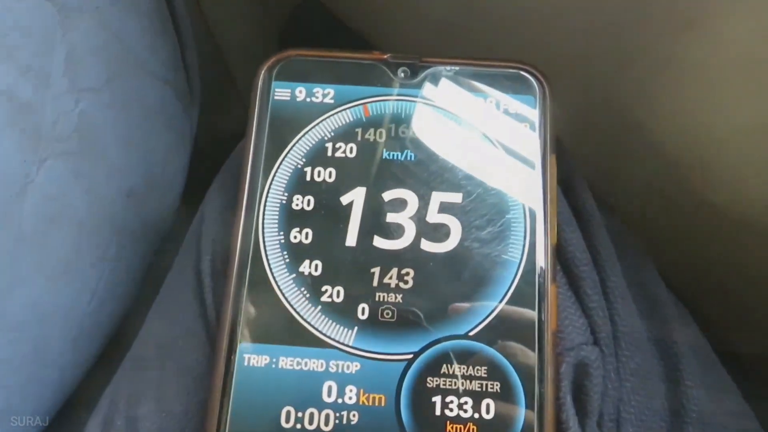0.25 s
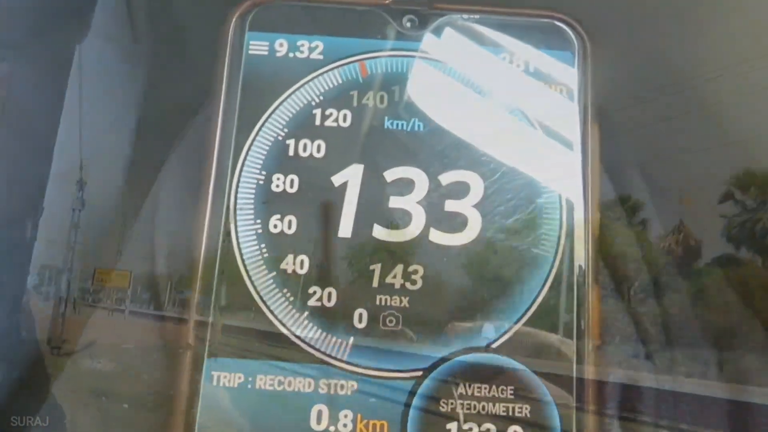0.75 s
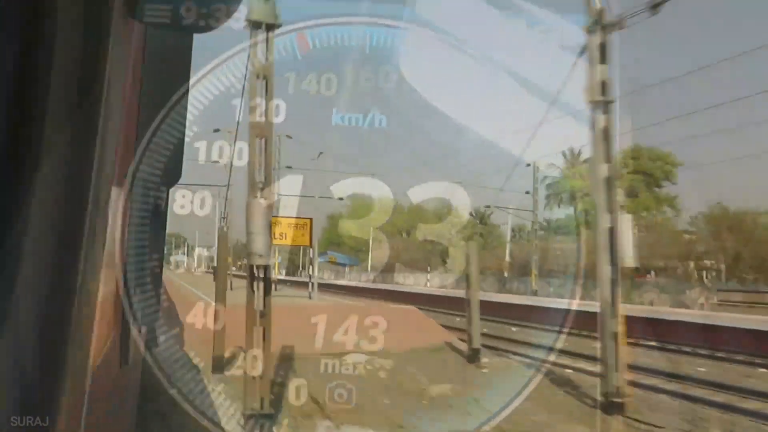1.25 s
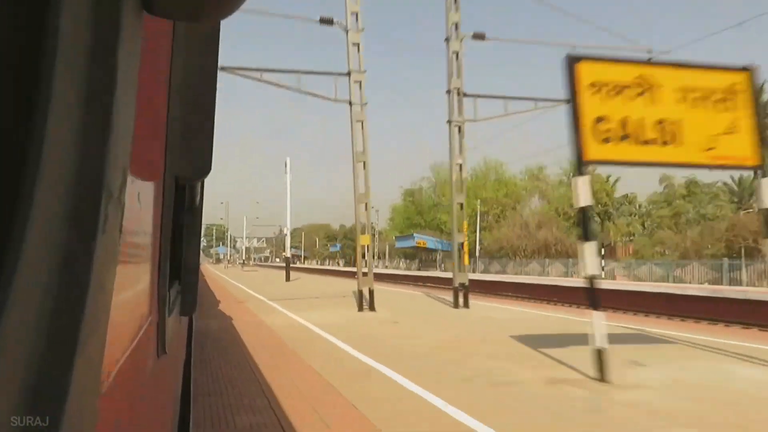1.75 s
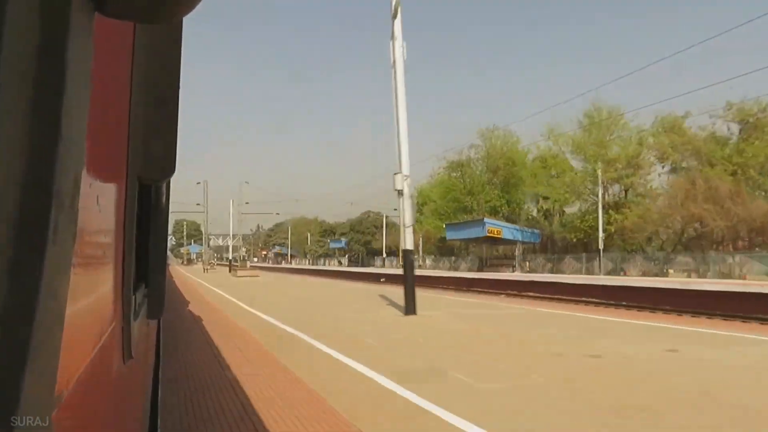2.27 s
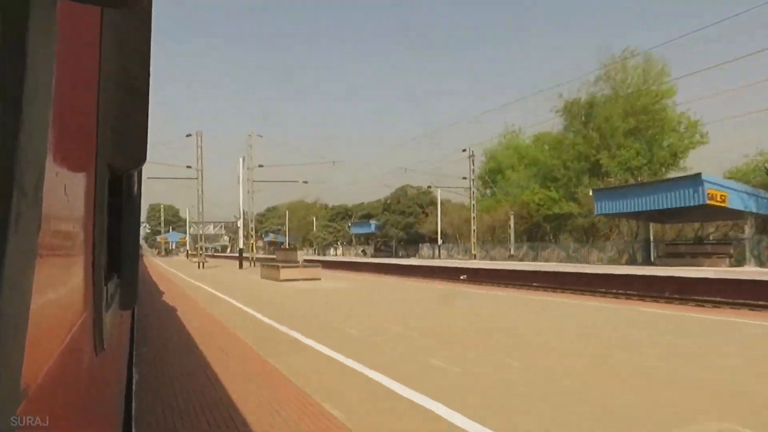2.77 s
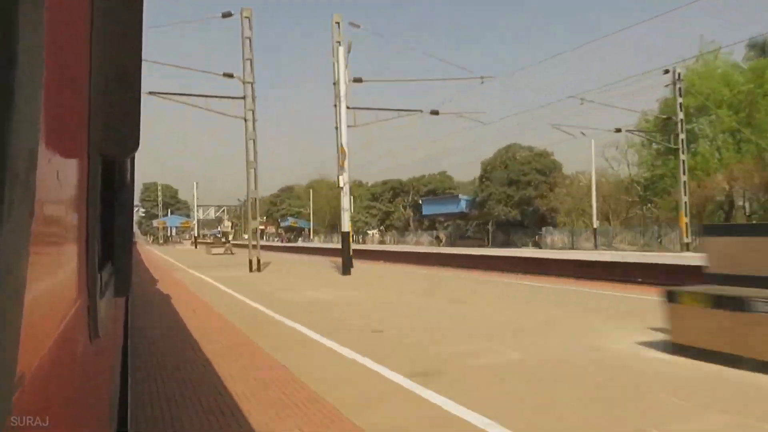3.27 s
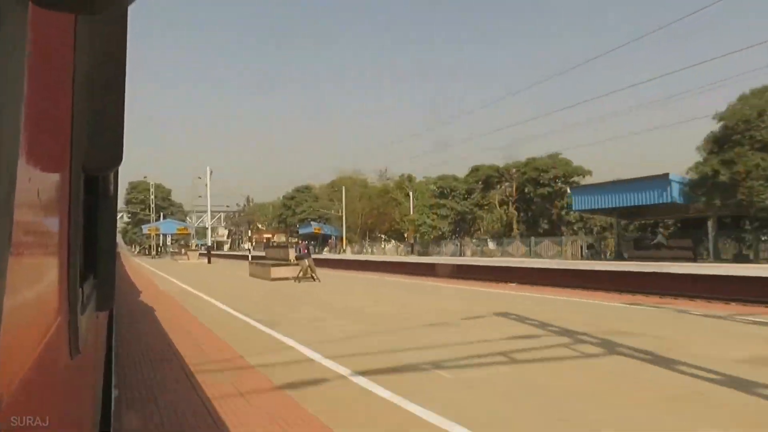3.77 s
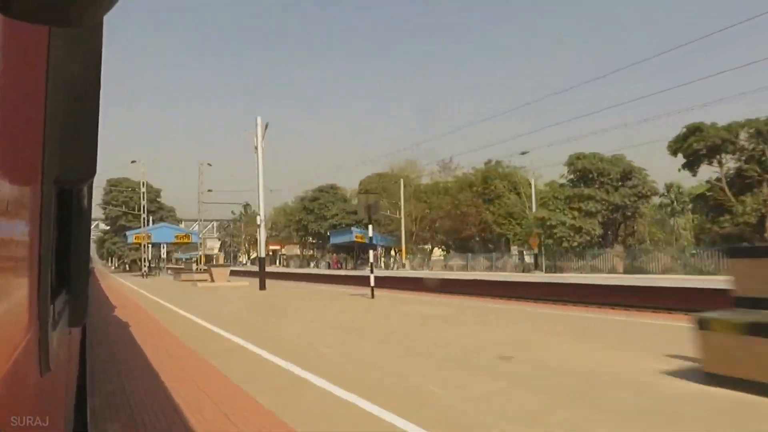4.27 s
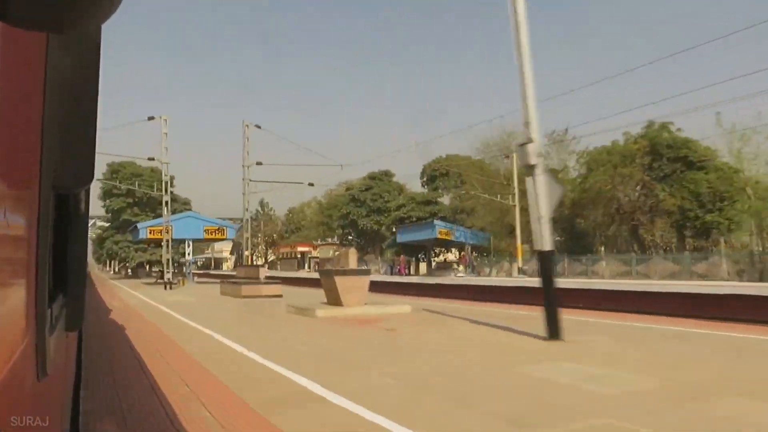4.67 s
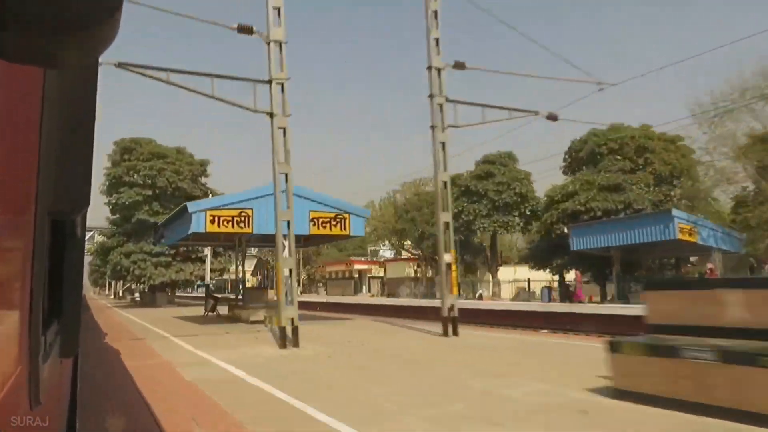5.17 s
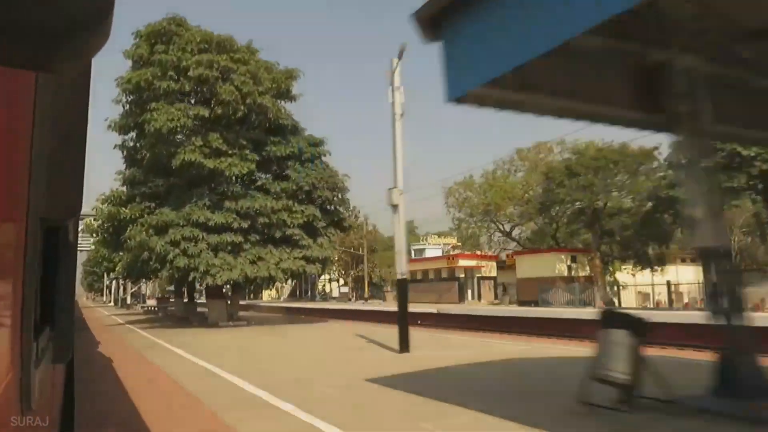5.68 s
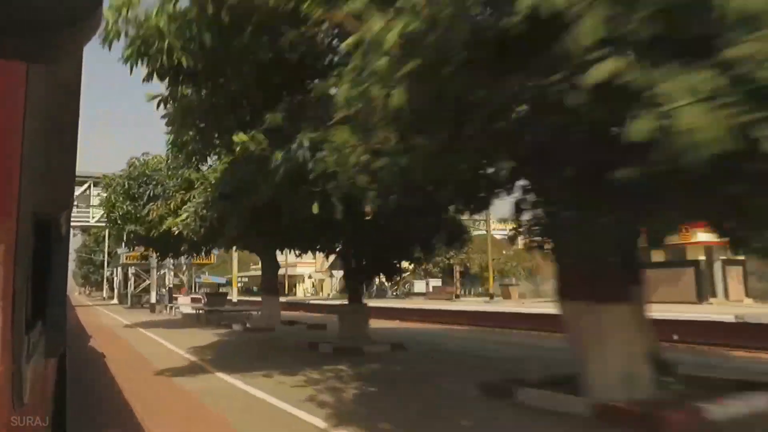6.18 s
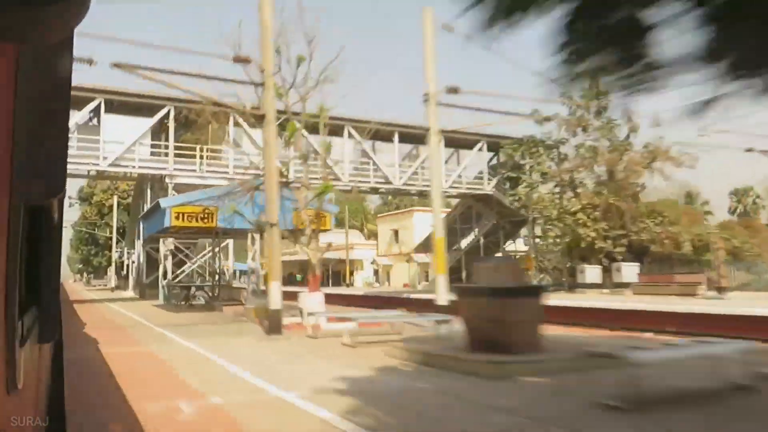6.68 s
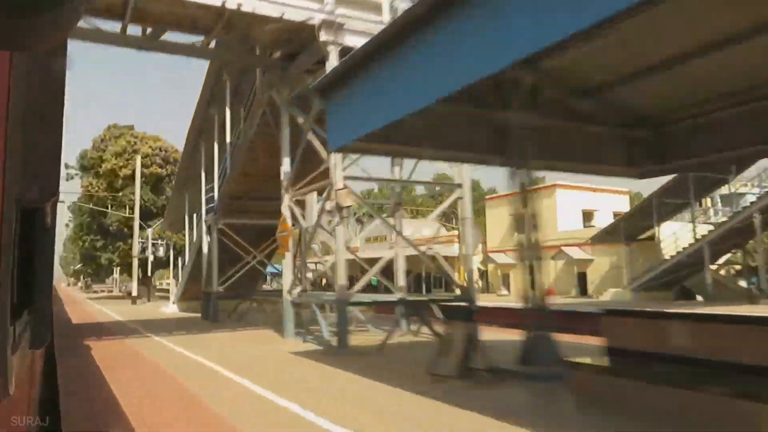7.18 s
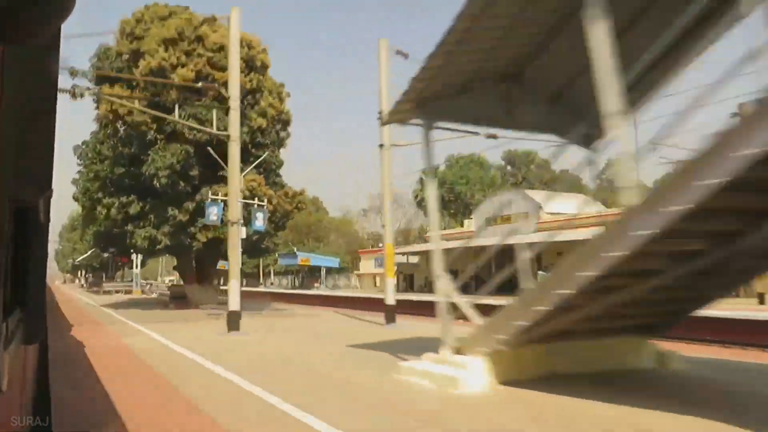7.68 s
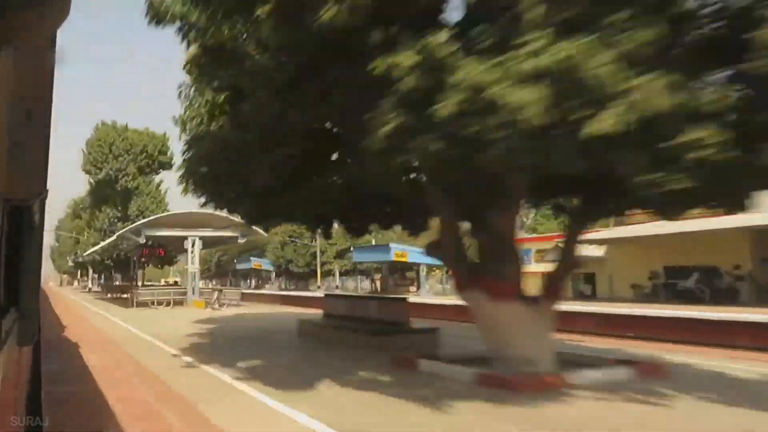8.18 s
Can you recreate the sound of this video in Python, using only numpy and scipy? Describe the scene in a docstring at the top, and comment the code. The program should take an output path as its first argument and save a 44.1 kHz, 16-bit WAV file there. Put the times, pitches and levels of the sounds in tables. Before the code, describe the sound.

From 0 s we are seated inside a fast train coach: a deep, lumpy boom around the low bass, broad rolling noise and draught, with heavy ringing body thumps near 0.1, 0.2 and 0.5 s and a faint wavering pair of thin high tones that ends by 1.2 s. The interior fades out until 1.7 s, crossing into an open doorway. From 1.5 to 2.4 s it is comparatively quiet, with thin airy hiss, light slaps and small pops. A cluster of wind pops and slaps hits at 2.3-2.9 s, then another near 3.0 s and a brief easing. From 4.1 s the resonant, metallic wheel-and-rail roar is strong and gusts thicken, buffeting the close stereo microphone in rapid irregular bursts. Especially hard low pops land near 5.4, 5.55 and 6.95 s, with deep air pushes around 7 s. A slight lull at 7.5 s, then more gusts until the abrupt end at about 8.4 s.

```python
"""A fast passenger train heard from on board: wheels and rails roar as noise lifted at their resonances.
A booming seat inside the coach, with ringing thumps and two thin tones, fades over into the open doorway.
There, gusts of the airstream buffet a pair of close microphone ports: turbulent noise of single eddies,
with sudden slaps, short waves for the pressure pops and a thin band of hiss."""
import sys
import numpy as np
from scipy import signal
from scipy.fft import rfft, irfft, next_fast_len
from scipy.io import wavfile
from scipy.ndimage import uniform_filter1d

SR = 44100
rng = np.random.default_rng(int(sys.argv[2]) if len(sys.argv) > 2 else 0)


def transcribe(u):
    """Save the signal u as a 16-bit wav file named by the first command-line argument.

    u: samples, shape (n,) or (channels, n), limited to [-1, 1]; the rate is SR.
    q: integer samples, one column per channel.
    """
    v = np.clip(np.atleast_2d(u).T, -1, 1)
    q = np.round(v * 32767).astype(np.int16)
    wavfile.write(sys.argv[1], SR, q)


def ratio(d):
    """dB to gain"""
    e = np.asarray(d, float) / 20
    return 10 ** e


N = 372204
T = np.arange(N) / SR  # time of every sample, s

# Colour of the coach boom. Each row: frequency in Hz, relative density in dB per Hz.
BOOM_COLOUR = [(15, -29), (30, -1), (45, -4), (60, 4.5), (80, -7.5), (115, -3), (170, -6.5), (260, -18.5),
               (400, -31), (800, -62.5)]
# The boom's difference between the ports over their sum. Each row: frequency in Hz, ratio in dB.
BOOM_APART = [(25, -38), (150, -19.5), (600, -3)]
# Jolts of the coach body that swell the boom. Each row: peak time in seconds, lift in dB.
JOLTS = [(0.24, 4.5), (0.5, 5), (0.89, 5), (1.25, 6)]
# Rolling noise over the even roar at the seat. Each row: time in seconds, base level in dB.
ROLL = [(0.21, -28.5), (0.29, -50), (1.48, -46.5), (1.69, -39.5), (2.09, -39.5), (2.98, -34), (3.02, -30),
        (3.26, -35.5), (3.38, -30.5), (4.09, -26), (4.28, -19), (4.33, -25.5), (4.58, -21.5), (4.89, -21.5),
        (4.92, -24.5), (5.55, -21.5), (5.58, -30), (5.99, -23.5), (6.3, -25.5), (6.93, -19), (6.98, -24.5),
        (7.29, -22), (7.33, -30), (7.72, -25.5), (8.44, -25.5)]
# Colour of the rolling noise. Each row: frequency in Hz, relative density in dB per Hz.
ROLL_COLOUR = [(40, -1), (200, 8), (500, -3), (1200, 5), (2000, 5.5), (2550, 1), (3050, -2.5), (3450, -8),
               (5400, -4.5), (6200, -17.5), (8000, -23.5), (11000, -28.5), (12500, -32), (15000, -4.5)]
# Rail and wheel resonances standing out of the roar. Each row: centre in Hz, width in Hz, mean height in dB.
RINGS = [(451.6, 69, 21.5), (833.4, 74, 18.5), (1008, 76, 11), (1625, 210, 8), (1843, 83, 7.5),
         (2240, 44, 6.5), (2865, 215, 9), (3790, 18, 12), (4220, 20, 9), (4630, 90, 6.5)]
# How the roar differs at the seat. Each row: frequency in Hz, lift in dB.
SEAT_COLOUR = [(1500, -4), (1850, 0.5), (2900, 4.5), (4050, 2.5), (5500, -6), (7000, 1.5), (11000, 2)]
# The seat's colour goes: its start and end in seconds.
SEAT_GONE = (1.15, 1.3)
# The roar's treble. Each row: time in seconds, lift in dB, factor on the height of its resonances.
TREBLE = [(1.5, 3, 0.9), (3, 1, .8), (4.4, 1, 1), (4.7, 1.5, 1.3), (5.5, 3, 1.4), (5.65, 2, 0.74),
          (8.44, 0, 0.64)]
# Brief flares of the roar. Each row: peak time in seconds, lift in dB.
FLARES = [(2.73, 4.5), (4.78, 4), (4.89, 3), (4.96, 3), (5.74, 3), (6.0, 2.5), (6.17, 3), (6.47, 3.5),
          (7.0, 3.5), (7.1, 2.5)]
# Far sound: the ports' difference over their sum. Each row: frequency in Hz, ratio in dB.
APART_FAR = [(25, -37), (1500, -57), (2600, -20.5), (3400, -9.5), (5500, -9.5), (8000, 1.5), (13000, 3.5)]
# Eddies at the ports: their difference over their sum. Each row: frequency in Hz, base ratio in dB.
APART_NEAR = [(25, -63), (250, -48), (450, -20.5), (1000, -18.5), (2000, -8), (5000, 7), (13000, 11)]
# Colour of the deep heave of air. Each row: frequency in Hz, relative density in dB per Hz.
HEAVE_COLOUR = [(15, -24), (35, -16), (70, 1), (110, 4.5), (170, -15), (300, -81.5)]
# Colour of the buffeting. Each row: frequency in Hz, relative density in dB per Hz.
WIND_COLOUR = [(30, -33), (80, -21.5), (140, -2.5), (230, -0.5), (400, -0.5), (600, -12), (900, -36.5),
               (1600, -58), (9000, -100)]
# Colour of the brighter rasp. Each row: frequency in Hz, relative density in dB per Hz.
RASP_COLOUR = [(200, -40), (450, -8), (700, 0), (1300, -3), (2000, -12), (3200, -28), (5500, -40),
               (7500, -50), (10000, -70)]
# Colour of the slaps. Each row: frequency in Hz, relative density in dB per Hz.
SLAP_COLOUR = [(40, -40), (120, -14), (250, -3), (500, -2.5), (800, -11), (1600, -27), (9000, -100)]
# Airstream at the doorway between gusts. Each row: time in seconds, buffeting in dB, rasp in dB.
STREAM = [(1.2, -46, -45.5), (1.95, -40.5, -41.5), (2.18, -51, -45), (2.21, -41, -45.5), (2.5, -35, -40),
          (2.95, -31, -33), (3.38, -41, -40), (3.76, -41, -36.5), (4.1, -37.5, -29.5), (4.5, -34.5, -26.5),
          (4.85, -26.5, -27.5), (5.35, -29.5, -27), (5.48, -33.5, -32), (5.95, -27.5, -28.5),
          (6.44, -29, -27.5), (6.85, -23.5, -24.5), (7.05, -38.5, -30), (7.3, -26.5, -28),
          (7.57, -40, -33.5), (7.85, -25, -27), (8.44, -26, -24.5)]
# Gusts that swell the buffeting. Each row: start in seconds, length in seconds, peak gain in dB.
GUSTS = [(1.618, 0.13, -35), (2.48, 0.15, -28.5), (2.644, 0.068, -26), (2.714, 0.23, -28.5),
         (2.985, 0.09, -25.5), (3.362, 0.33, -29), (3.823, 0.12, -35), (4.123, 0.26, -22.5),
         (4.344, 0.1, -23.5), (4.574, 0.14, -22.5), (4.773, 0.053, -16), (4.853, 0.1, -20.5),
         (4.936, 0.058, -14), (5.004, 0.072, -16), (5.139, 0.13, -21.5), (5.269, 0.072, -19),
         (5.378, 0.092, -21.5), (5.508, 0.1, -23), (5.568, 0.11, -18.5), (5.672, 0.095, -25),
         (5.844, 0.12, -19.5), (5.964, .11, -17.5), (6.104, 0.079, -16.5), (6.263, 0.13, -17.5),
         (6.462, 0.08, -18), (6.58, 0.11, -21), (6.734, 0.084, -17.5), (6.877, 0.12, -19.5),
         (7.06, 0.21, -18.5), (7.223, .11, -15.5), (7.337, 0.13, -26.5), (7.632, 0.045, -22),
         (7.681, 0.11, -22.5), (7.838, 0.16, -33), (8.13, 0.046, -22), (8.21, 0.058, -20),
         (8.262, 0.071, -17.5), (8.351, 0.042, -16)]
# Deep pushes of air in the heave. Each row: peak time in seconds, lift in dB.
PUSHES = [(4.96, 4), (5.17, 11), (6.15, 9), (6.97, 19.5), (7.11, 5), (7.3, 9), (8.38, 17)]
# Sudden slaps of air. Each row: start in seconds, gain in dB, rasp over the slap in dB, length in seconds.
SLAPS = [(1.338, -36, -2.5, 0.042), (1.454, -36, -3, 0.015), (1.645, -34.5, -2, 0.054),
         (1.735, -33, 1, 0.046), (1.874, -43, -2, 0.028), (2.21, -32.5, -1, 0.016),
         (2.391, -32.5, -4.5, 0.026), (2.558, -21.5, -9, 0.022), (2.712, -20, -6, 0.059),
         (2.73, -20, -9, 0.027), (2.789, -23, -5, 0.01), (2.813, -25, -5, 0.0084),
         (2.834, -19.5, -5, 0.012), (3.35, -26, -2.5, 0.02), (4.117, -21, 0.5, 0.045),
         (4.202, -20, 0, 0.012), (4.398, -15, -19, 0.01), (4.775, -18.5, 3.5, 0.017),
         (4.869, -20.5, 1, 0.039), (5.53, -15, 1, 0.028), (5.738, -11.5, -4, 0.0079),
         (6.118, -20, 1.5, 0.022), (6.467, -13, -14, 0.01), (6.735, -12, -10, 0.0086),
         (7.087, -13, -19, 0.034), (7.277, -18.5, 3, 0.036), (7.71, -23.5, -2, 0.092)]
# How far the eddies strike one port alone. Each row: time in seconds, base lift of the difference in dB.
ONE_SIDED = [(0, 4.5), (1.4, 10), (2.1, -3), (2.25, 14), (3.3, -5), (4.15, -18), (4.85, -28), (5.05, -2.5),
             (7.55, -7), (8.44, -3.5)]
# Colour of the doorway hiss. Each row: frequency in Hz, relative density in dB per Hz.
HISS_COLOUR = [(4500, -23), (6200, 5), (7300, 0.5), (8300, -8), (10500, -41)]
# The hiss before it wavers. Each row: time in seconds, level in dB.
HISS_LEVEL = [(1.45, -71), (1.65, -59.5), (2.3, -63.5), (8.44, -78)]
# Two thin tones at the seat. Each row: mean pitch in Hz, starting level in dB before it wavers.
WHINE_TONES = [(1820, -41), (1880, -46)]
# Heavy thumps of the coach body. Each row: start in seconds, gain in dB.
THUMPS = [(0.093, -14), (0.173, -9), (0.462, -9.5)]
# Modes in which the body rings. Each row: pitch in Hz, gain in dB, time to fall by 60 dB in seconds.
BODY = [(58.6, -2, 0.51), (115, -7.5, 0.65), (161.2, -6, 0.29), (288.7, -12, 0.21)]
# Pops of air pressure on the ports. Each row: start in seconds, gain in dB, pitch in Hz.
POPS = [(1.526, -21, 680), (2.319, -16, 435), (2.368, -21, 320), (2.408, -22, 800), (2.446, -13.5, 610),
        (2.5, -7.5, 850), (2.564, -10, 520), (2.598, -18, 303), (2.655, -17, 460), (2.742, -8, 237),
        (3.022, -13, 800), (3.034, -15, 330), (4.351, -16, 606), (5.435, -1.5, 535), (5.551, -0.5, 436),
        (6.955, -0.5, 627), (7.742, -7, 296), (8.302, -6, 323)]

# The seat fades out evenly, bent by a power for the boom and for the roar
SEAT_END_S, BOOM_CURL, ROAR_CURL = 1.72, 1.48, 1
ROAR_STEP_DB = -4  # roar and draught at the seat slide down while the seat's colour goes
# Base levels at the start of the seat's fade
BOOM_DB, SEAT_ROLL_DB, SEAT_BUFFET_DB, SEAT_RASP_DB = -18.5, -28, -30.5, -27.5
JOLT_RISE_S, JOLT_FALL_S = 0.015, 0.07
RING_DRIFT, RING_WAVER_DB = 0.004, 1.5  # wander of a resonance: share of its pitch, dB of its height
SEAT_RINGS_BELOW_HZ = 2500  # higher resonances are not heard at the seat
TREBLE_HZ = 3370
FLARE_RISE_S, FLARE_FALL_S = 0.006, 0.011
FLARE_HISS_DB = -16.5  # flare hiss against the rolling level, before the flare's own gain
GUST_LATE, GUST_ROUND = 1.37, 0.61  # a gust peaks late and ends quickly; small round = flat top
RASP_SHARE = 0.5  # share of a gust's lift in dB that the rasp takes
# Heave: base level at -25 dB of buffeting, dB per dB of buffeting, smoothing time
HEAVE_DB, HEAVE_SLOPE, HEAVE_SMOOTH_S = -45, 1.14, 0.12
PUSH_RISE_S, PUSH_FALL_S = 0.02, 0.11
SIDE_SLOPE = 0.48  # a gust strikes more one-sided: dB per dB of buffeting over -25 dB
WHINE_FADE_DB_PER_S, WHINE_WAVER_DB, WHINE_WAVER_HZ, WHINE_END_S = -3.5, 2, 9, 1.19
POP_CYCLES = 1.52  # cycles until a pop's envelope has fallen to about a third
POP_EDGE, POP_EDGE_DB = 2.1, -10.5  # brighter, shorter edge on each pop: multiple of its pitch, dB


def evened(x):
    """Scales to rms 1."""
    return x / np.sqrt(np.mean(x ** 2) + 1e-20)


def read(points, hz):
    """Reads a spectrum on a log-frequency axis."""
    f, value = np.transpose(points)
    return np.interp(np.log(hz + 1), np.log(f + 1), value)


def curve(rows):
    """Draws the columns of a table as curves over every sample."""
    s, *columns = np.transpose(rows)
    return [np.interp(T, s, c) for c in columns]


def lumps(hz):
    """Slow random wander of rms 1: noise low-passed at hz."""
    lowpass = signal.butter(2, np.clip(hz, 1, 2000), fs=SR, output="sos")
    return evened(signal.sosfilt(lowpass, rng.standard_normal(N)))


def swells(rows, rise_s, fall_s):
    """Sum of brief lifts in dB, each peaking at its time."""
    return sum(db * np.exp(np.minimum((T - s) / rise_s, (s - T) / fall_s)) for s, db in rows)


def at_ports(drive, colour, apart):
    """Colours a common and an unshared drive; the two ports get their sum and difference."""
    size = next_fast_len(N)
    hz = np.fft.rfftfreq(size, 1 / SR)
    both, odd = rfft(drive, size) * ratio(read(colour, hz))
    odd = odd * ratio(read(apart, hz))
    both, odd = irfft([both, odd], size)[:, :N]
    return np.array([both + odd, both - odd]) / np.std(both)


def seat():
    """Gains of the boom and of the roar heard at the seat, as the seat fades out."""
    left = np.clip(1 - T / SEAT_END_S, 0, 1)
    step_db = np.interp(T, SEAT_GONE, [0, ROAR_STEP_DB])
    return left ** BOOM_CURL, left ** ROAR_CURL * ratio(step_db)


def boom():
    """Low lumpy shaking of the coach body, swelling at each jolt."""
    lift_db = swells(JOLTS, JOLT_RISE_S, JOLT_FALL_S)
    shake = rng.standard_normal((2, N)) * ratio(1.5 * lumps(45))
    return at_ports(shake, BOOM_COLOUR, BOOM_APART) * ratio(BOOM_DB + lift_db) * seat()[0]


def rolling():
    """Roughness of wheel and rail: noise in drifting patches, lifted at the steel's resonances."""
    level = np.hypot(ratio(curve(ROLL)[0]), ratio(SEAT_ROLL_DB) * seat()[1])
    hz, t, noise = signal.stft(rng.standard_normal((2, N)), SR, nperseg=1024, noverlap=768)

    # each resonance wanders slowly in pitch and height
    wander = uniform_filter1d(rng.standard_normal((len(RINGS), len(t), 2)), size=40, axis=1)
    drift, waver = evened(wander).transpose(2, 0, 1)
    rings_db = 0
    for (centre, width, db), d, v in zip(RINGS, drift, waver):
        detune = 2 * (hz[:, None] - centre * (1 + RING_DRIFT * d)) / width
        rings_db = rings_db + (db + RING_WAVER_DB * v) / (1 + detune ** 2)

    # the seat has its own colour and loses the high resonances
    unheard_db = rings_db * (hz > SEAT_RINGS_BELOW_HZ)[:, None]
    tilt_db = (read(SEAT_COLOUR, hz)[:, None] - unheard_db) * np.interp(t, SEAT_GONE, [1, 0])

    s, lift_db, depth = np.transpose(TREBLE)
    treble = 1 / (1 + (TREBLE_HZ / (hz + 1)) ** 10)
    tilt_db += np.outer(treble, np.interp(t, s, lift_db))
    tilt_db += treble[:, None] * rings_db * (np.interp(t, s, depth) - 1) * (t > SEAT_GONE[1])

    patches = uniform_filter1d(rng.standard_normal(noise.shape[1:]), size=6, axis=0)
    patches = evened(uniform_filter1d(patches, size=14, axis=1))
    coloured = noise * ratio(rings_db + tilt_db + 1.6 * patches)
    rough = signal.istft(coloured, SR, nperseg=1024, noverlap=768)[1][:, :N]
    sway_db = 1.07 * lumps(17) + swells(FLARES, FLARE_RISE_S, FLARE_FALL_S)
    return at_ports(rough, ROLL_COLOUR, APART_FAR) * level * ratio(sway_db)


def eddies(per_s, spread_db, share):
    """Single pressure pulses of either sign, a few large, over smooth turbulence."""
    hit = rng.random((2, N)) < per_s / SR
    size = ratio(spread_db * np.minimum(rng.exponential(1, (2, N)), 4))
    size = size * rng.choice([-1, 1], (2, N))
    return share * evened(hit * size) + (1 - share) * rng.standard_normal((2, N))


def airstream():
    """Gains of buffeting, rasp and heave: gusts over the steady stream, plus the draught at the seat."""
    calm, rasp = ratio(np.array(curve(STREAM)))
    gusts = np.zeros(N)
    for s, length, db in GUSTS:
        u = np.clip((T - s) / length, 0, 1)
        gusts += ratio(db) * np.abs(np.sin(np.pi * u ** GUST_LATE)) ** GUST_ROUND * (u < 1)
    buffet = np.hypot(calm, gusts)
    rasp = rasp * (buffet / calm) ** RASP_SHARE

    # the heave follows the smoothed buffeting
    smooth = np.sqrt(np.abs(uniform_filter1d(buffet ** 2, round(HEAVE_SMOOTH_S * SR))))
    push_db = swells(PUSHES, PUSH_RISE_S, PUSH_FALL_S)
    heave = ratio(HEAVE_DB + push_db) * (smooth / ratio(-25)) ** HEAVE_SLOPE

    draught = seat()[1]
    buffet = np.hypot(buffet, ratio(SEAT_BUFFET_DB) * draught)
    rasp = np.hypot(rasp, ratio(SEAT_RASP_DB) * draught)
    return buffet, rasp, heave


def slap_gains():
    """Gains of the slaps and of their rasp: quick rise, flat top, quick end."""
    slap, crack = np.zeros((2, N))
    for s, db, bright_db, length in SLAPS:
        u = np.clip((T - s) / max(length, 0.004), 0, 5)
        shape = ratio(db) * np.tanh((u * length / 0.0035) ** 2) * np.exp(-u ** 8)
        slap += shape
        crack += shape * ratio(bright_db)
    return slap, crack


def wind():
    """Eddies shed at the ports: a heave, a buffeting and a brighter rasp that share gusts, plus slaps."""
    buffeting, rasping, heaving = airstream()
    slap, crack = slap_gains()
    gust_db = 2.06 * lumps(22)

    # now and then an eddy strikes one port alone
    side = ratio(curve(ONE_SIDED)[0] + 3.3 * lumps(8))
    side *= (buffeting / ratio(-25)) ** SIDE_SLOPE

    large = eddies(500, 4.3, 0.46)
    large[1] *= side
    heave = at_ports(large, HEAVE_COLOUR, APART_NEAR) * heaving * ratio(0.95 * gust_db)
    buffet = at_ports(large, WIND_COLOUR, APART_NEAR) * buffeting * ratio(gust_db)

    fine = eddies(1200, 2.0, 0.56)
    fine[1] *= side
    crackling = fine + 0.52 * large  # the large eddies crackle in the rasp too
    rasp = at_ports(crackling, RASP_COLOUR, APART_NEAR) * rasping * ratio(gust_db)

    dense = rng.standard_normal((2, 2, N))  # a slap is fully turbulent
    dense[:, 1] *= side
    slaps = at_ports(dense[0], SLAP_COLOUR, APART_NEAR) * slap
    slaps += at_ports(dense[1], RASP_COLOUR, APART_NEAR) * crack
    return heave + buffet + rasp + slaps


def hiss():
    """Thin wavering hiss of air at the doorway: a band of noise that also flares with the roar."""
    level_db, = curve(HISS_LEVEL)
    flare_gain = ratio(2 * swells(FLARES, FLARE_RISE_S, FLARE_FALL_S)) - 1
    flare = ratio(curve(ROLL)[0] + FLARE_HISS_DB) * flare_gain
    air = at_ports(rng.standard_normal((2, N)), HISS_COLOUR, APART_FAR)
    return air * np.hypot(ratio(level_db + 2 * lumps(21)), flare)


def whine():
    """Two sine tones that waver in pitch and level, fade and stop."""
    tones = np.zeros(N)
    for hz, db in WHINE_TONES:
        level = ratio(db + WHINE_WAVER_DB * lumps(12))
        turns = np.cumsum(hz + WHINE_WAVER_HZ * lumps(11)) / SR
        tones += level * np.sin(2 * np.pi * turns)
    ending = np.clip((WHINE_END_S - T) / 0.013, 0, 1)
    return np.sqrt(2) * tones * ratio(WHINE_FADE_DB_PER_S * T) * ending


def thumps():
    """The coach body rings in its low modes after each heavy jolt."""
    out = np.zeros(N)
    for s, db in THUMPS:
        u = np.maximum(T - s, 0)
        ringing = sum(ratio(db + d - 60 * u / t60) * np.sin(2 * np.pi * hz * u) for hz, d, t60 in BODY)
        out += ringing * np.tanh(u / 0.0062)  # soft onset
    return out


def pops():
    """Each pop of air pressure is a short wave of a few cycles with a brighter edge."""
    out = np.zeros(N)
    for s, db, hz in POPS:
        turns = np.clip(T - s, 0, 0.1) * hz
        wave = np.sin(2 * np.pi * turns) * np.exp(-(turns / POP_CYCLES) ** 2)
        edge = np.sin(2 * np.pi * POP_EDGE * turns) * np.exp(-(2 * turns / POP_CYCLES) ** 2)
        out += ratio(db) * np.tanh(3 * turns) * (wave + ratio(POP_EDGE_DB) * edge)
    return out


def scene():
    """Seat boom, rolling roar, wind, hiss, whine, thumps and pops, summed at the two ports."""
    return boom() + rolling() + wind() + hiss() + whine() + thumps() + pops()


def roll_off(x):
    """The treble ends steeply here."""
    return signal.sosfilt(signal.butter(12, 15100, fs=SR, output="sos"), x)


def record(dry):
    """Loud gusts round off in the microphone amplifier and the capsule loses the top."""
    rounded = 1.3 * np.tanh(dry / 1.3)
    capsule = signal.butter(6, 11400, fs=SR, output="sos")
    return roll_off(signal.sosfilt(capsule, rounded))


dry = scene()
out = record(dry)
transcribe(out)
```